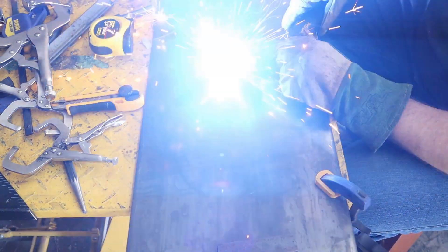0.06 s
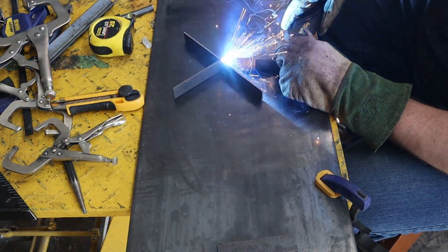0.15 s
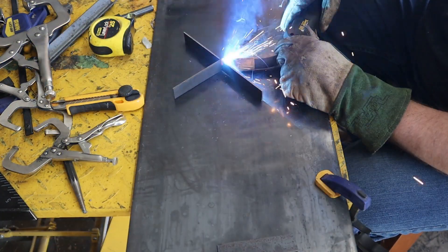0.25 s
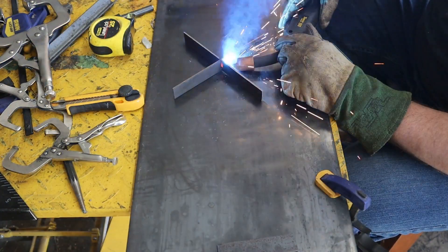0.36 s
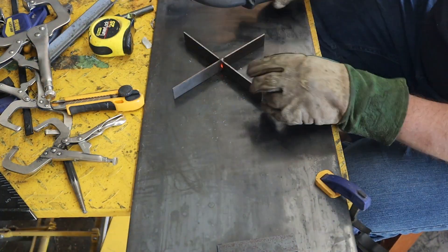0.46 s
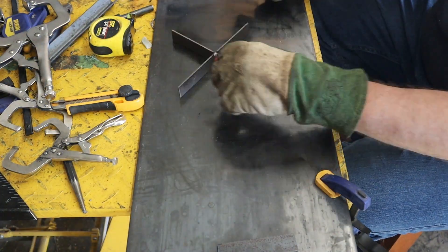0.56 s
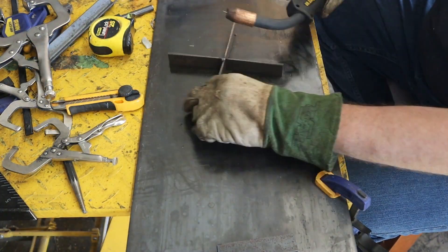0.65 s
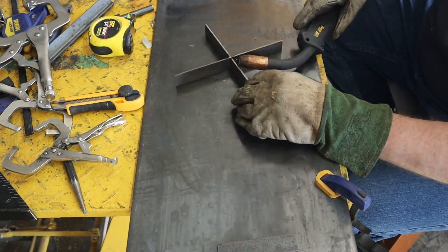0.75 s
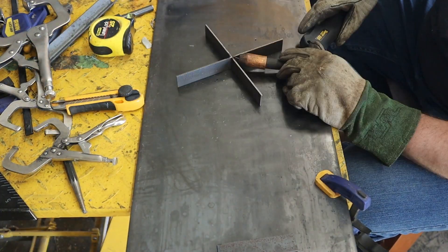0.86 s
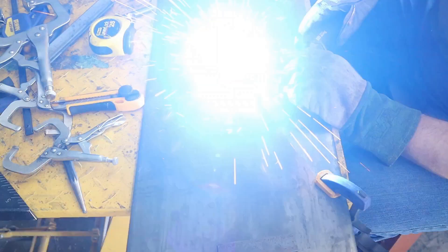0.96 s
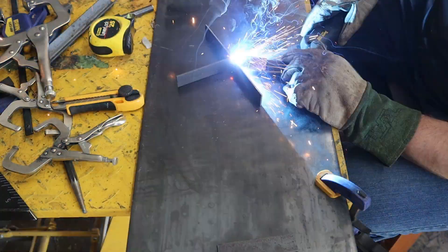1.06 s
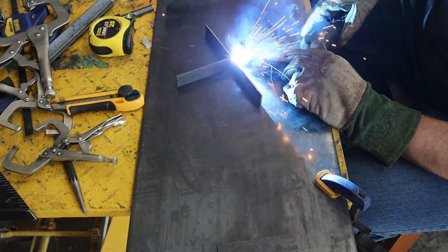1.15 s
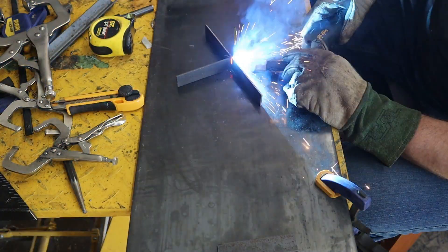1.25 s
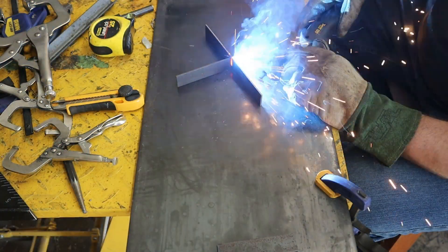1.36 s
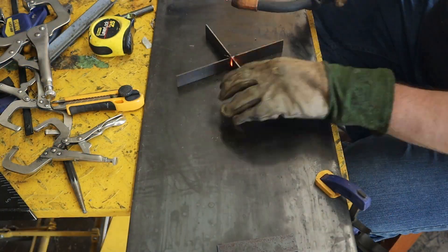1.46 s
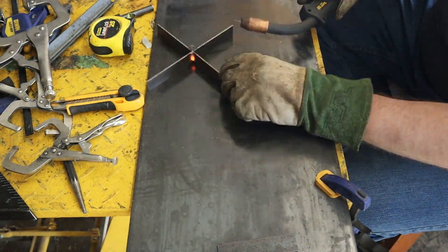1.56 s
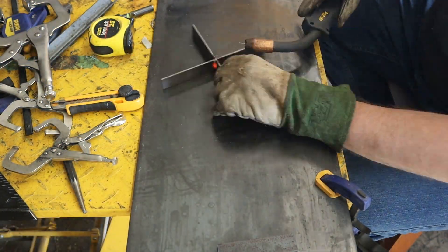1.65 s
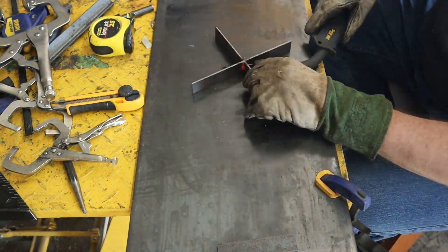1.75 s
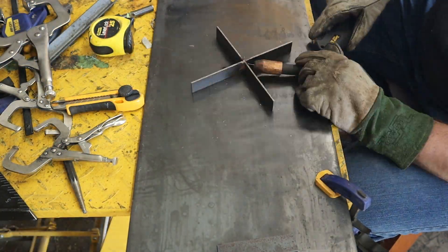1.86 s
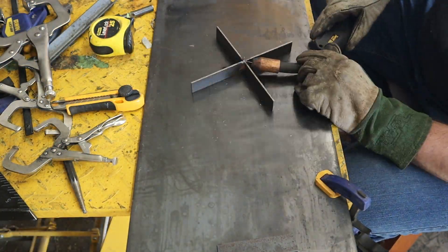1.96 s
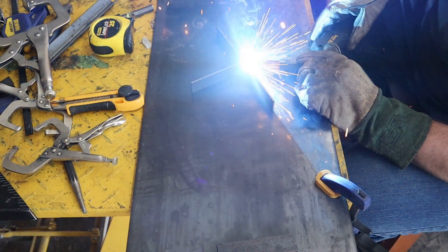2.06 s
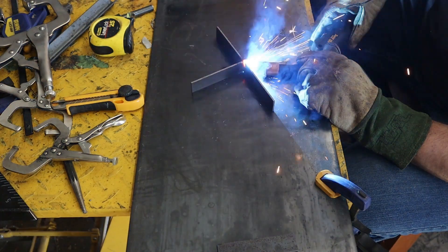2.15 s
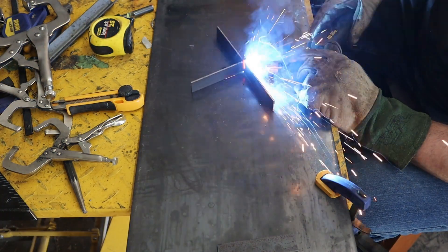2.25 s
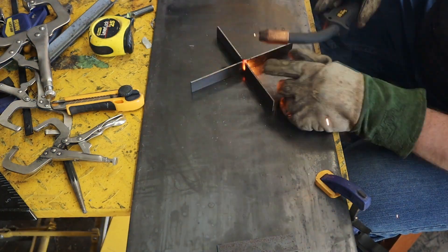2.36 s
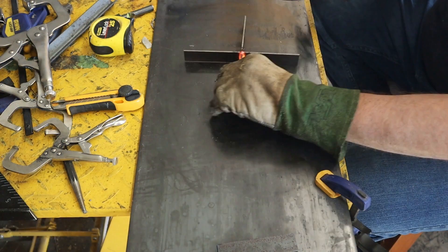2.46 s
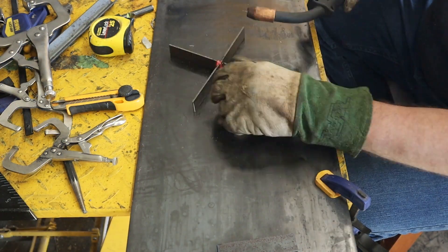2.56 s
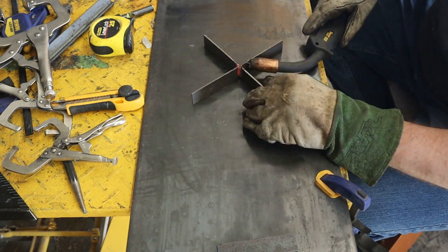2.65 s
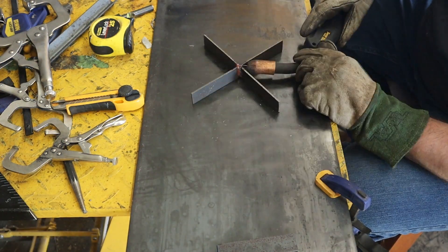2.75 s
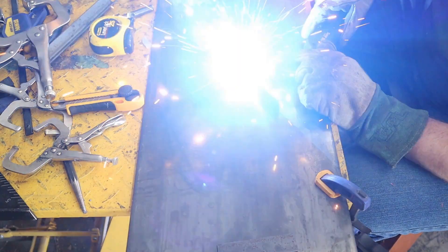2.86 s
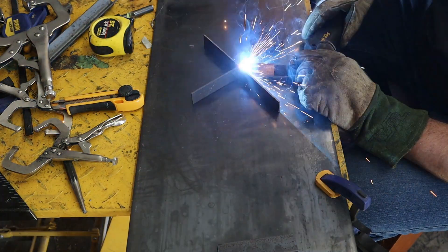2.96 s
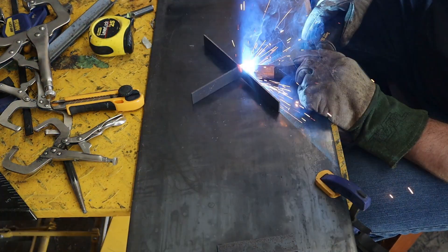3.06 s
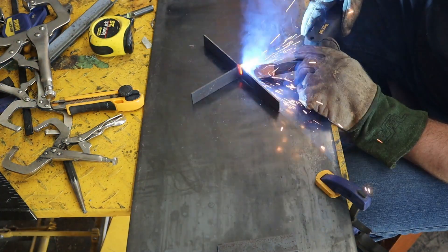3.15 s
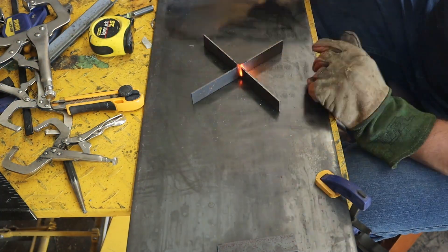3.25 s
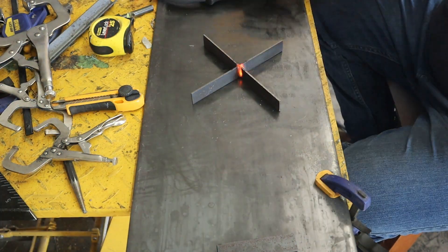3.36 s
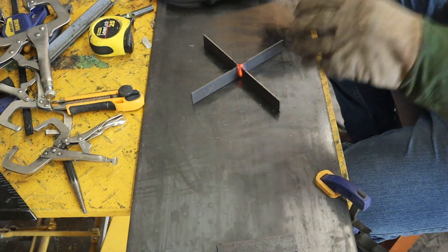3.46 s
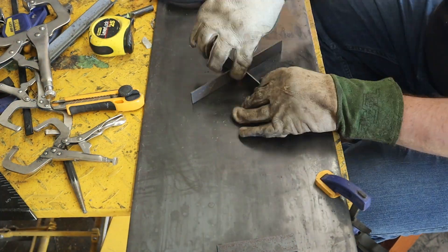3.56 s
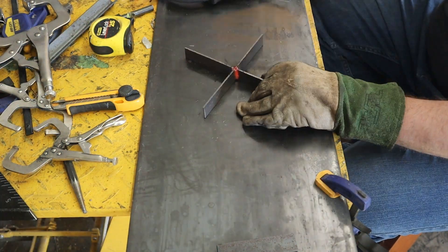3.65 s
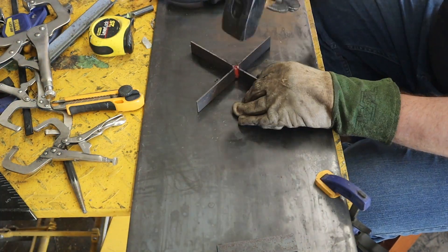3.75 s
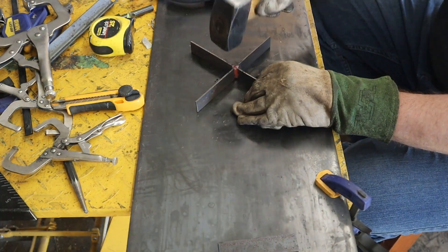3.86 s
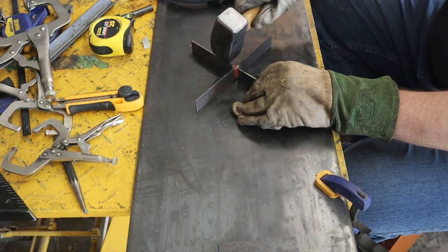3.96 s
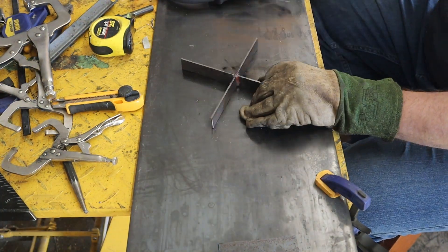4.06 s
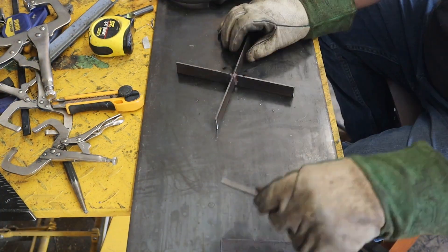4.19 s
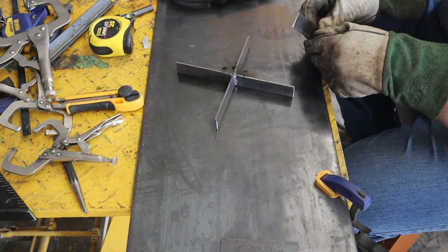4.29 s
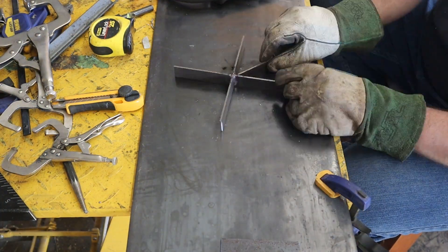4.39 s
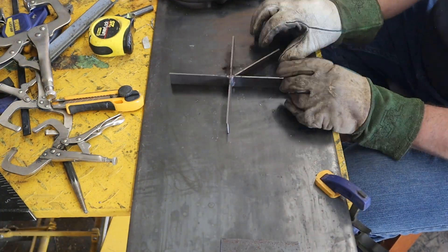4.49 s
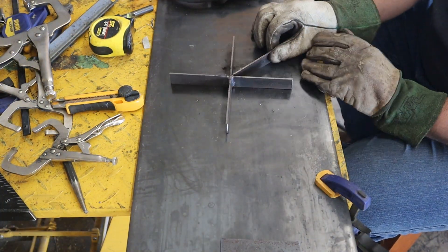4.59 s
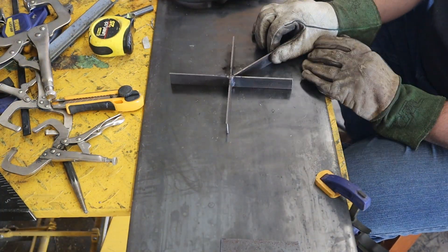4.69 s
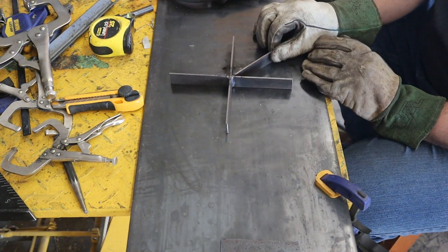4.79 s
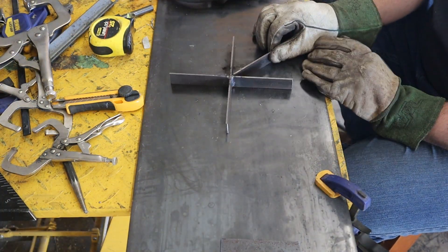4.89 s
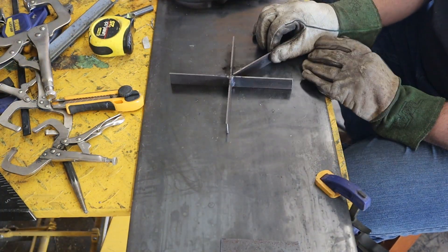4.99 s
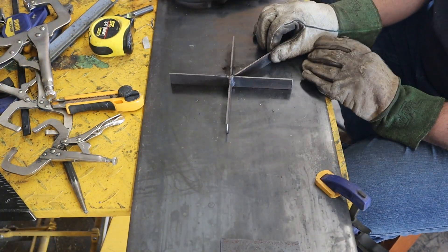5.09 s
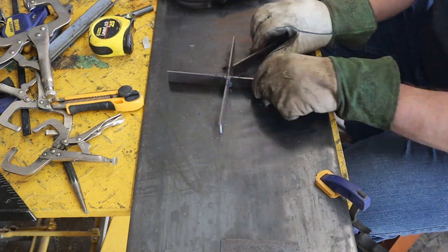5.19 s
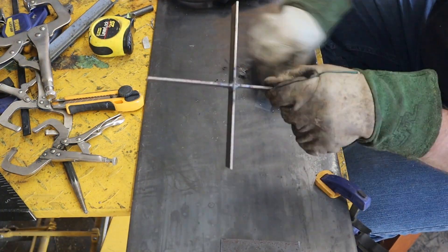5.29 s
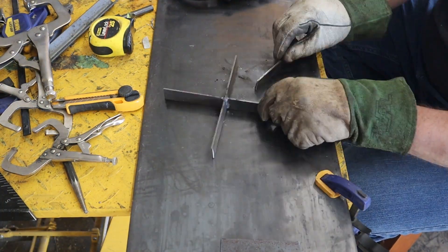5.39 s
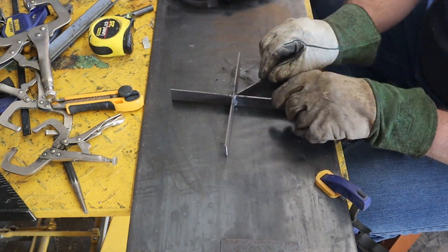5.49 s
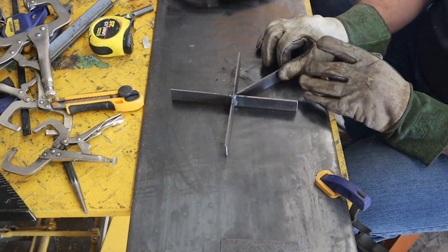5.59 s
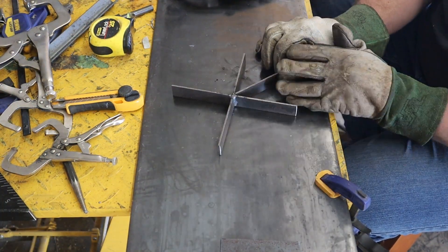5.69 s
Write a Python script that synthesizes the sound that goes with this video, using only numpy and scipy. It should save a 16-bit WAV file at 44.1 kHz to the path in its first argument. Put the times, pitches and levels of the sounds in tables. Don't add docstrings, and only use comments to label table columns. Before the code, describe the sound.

A phone-like microphone sits near a steel bench. Rapid electrical crackling with bright hiss and low pops fires four times, at roughly one-second intervals, the first attack distorting. Gloved handling makes clipped scrapes and clanks between. A cluster of hammering follows, with one overloaded blow, then a harsh scrape of a loose bar. Fan noise dips with each loud event and climbs back steadily.

```python
import sys
import numpy as np
from scipy import signal
from scipy.fft import rfft, irfft, next_fast_len
from scipy.io import wavfile

SR = 44100
rng = np.random.default_rng(int(sys.argv[2]) if len(sys.argv) > 2 else 0)


def wav_record(signal):
    frames = np.transpose(np.atleast_2d(signal))
    bounded = np.clip(frames, -1, 1)
    quanta = np.round(bounded * 32767).astype(np.int16)
    wavfile.write(sys.argv[1], SR, quanta)


def amplitude_ratio(level_db):
    exponent = np.asarray(level_db, float) / 20
    return 10 ** exponent


N = 252693
SLICE = 1470
SWELL_S = 0.00033

# pitch_hz, likeness (1 same, -1 opposite)
FAR_LIKENESS = [(100, 0.96), (400, 0.96), (1000, 0.41), (3000, -0.27), (6000, -0.43), (10000, -0.71),
                (15000, -0.21)]


def unit(x):
    return x / np.sqrt(np.mean(x ** 2) + 1e-20)


def along(points, hz):
    f, v = np.transpose(points)
    return np.interp(np.log(hz + 1), np.log(f + 1), v)


def slice_middles():
    return (np.arange(N) // SLICE + .5) * SLICE / SR


def held(rows, column=1):
    rows = np.array(rows)
    return np.interp(slice_middles(), rows[:, 0], rows[:, column], left=-120, right=-120)


def filtered(x, response):
    n = x.shape[-1]
    m = next_fast_len(n + 4096)
    return irfft(rfft(x, m) * response(np.fft.rfftfreq(m, 1 / SR)), m)[..., :n]


def peak(f, hz, width_hz):
    return 1j * f * width_hz / (hz * hz - f * f + 1j * f * width_hz)


def ports(f):
    # pitch_hz, width_hz
    cavities = [(9800, 1970), (10350, 1960)]
    cavity = np.array([hz * hz / (hz * hz - f * f + 1j * f * w) for hz, w in cavities])
    return cavity / (1 + (f / 14500) ** 6)


def stereo_noise(size, gain, likeness):
    turn = lambda f: np.arccos(np.clip(along(likeness, f), -1, 1)) / 2
    shares = lambda f: gain(f) * [np.cos(turn(f)), np.sin(turn(f))]
    mid, side = filtered(rng.standard_normal((2, size)), shares)
    return unit(filtered(np.array([mid + side, mid - side]), ports))


def until_cut(s):
    start = round(s * SR)
    cut = round(start / SLICE) * SLICE
    start = cut if abs(cut - start) < 120 else start
    return start, (start // SLICE + 1) * SLICE


def fan_level():
    full_db, recovery_db_per_s = -28, 47
    # pulled_s, let_go_s, fan_level_when_let_go_db
    ducks = [
        (.17, 0.591, -53),
        (1.17, 1.6, -56.5),
        (2.17, 2.574, -56.5),
        (3.04, 3.387, -56.5),
        (3.97, 4.29, -47),
        (5.4, 5.63, -45.5),
    ]
    t = slice_middles()
    db = np.full(N, float(full_db))
    for pulled, let_go, low_db in ducks:
        climb = low_db + recovery_db_per_s * np.maximum(t - let_go, 0)
        db = np.where(t > pulled, np.minimum(climb, full_db), db)
    return db


def fan():
    # pitch_hz, density_db (per Hz)
    air = [(30, -35), (120, -14), (260, -0.5), (500, -8), (1100, -8.5), (2200, -7), (4500, -13),
           (7500, -27.5), (11000, -72), (16000, -54)]
    # pitch_hz, width_hz, level_db
    case = [(713, 115, 4), (1500, 60, -0.5), (2100, 54, -41)]
    # shaft_multiple, level_db
    orders = [(1, -21.5), (4, -30), (7, -7.5), (8, -19.5), (14, -16.5)]
    shaft_hz, jump_rad = 108.46, 0.1383
    count = N // SLICE + 1
    size = count * SLICE
    housing = lambda f: amplitude_ratio(along(air, f)) + sum(amplitude_ratio(db) * abs(peak(f, hz, w)) for hz, w, db in case)

    phase_jumps = np.cumsum(jump_rad * rng.standard_normal(count))
    turn = 2 * np.pi * shaft_hz * np.arange(size) / SR + np.repeat(phase_jumps, SLICE)
    lines = sum(amplitude_ratio(db) * np.sin(round(k) * turn) for k, db in orders)
    unsteady = np.repeat(amplitude_ratio(3.5 * rng.standard_normal(count)), SLICE)
    whine = np.sqrt(2) * lines * unsteady

    steady = stereo_noise(size, housing, FAR_LIKENESS).reshape(2, -1, SLICE)
    shuffled = steady[:, rng.permutation(count)] * amplitude_ratio(rng.normal(0, 0.15, (count, 1)))
    balance_db = np.array([[-.8], [.8]])
    return (shuffled.reshape(2, -1) + whine)[:, :N] * amplitude_ratio(fan_level() + balance_db)


def handling():
    # start_s, level_db, edge_above_level_db, loudest_ring_hz
    torch = [(.167, -20.5, 10, 5000), (.533, -42, 14, 3000), (.567, -42, 8.5, 3790), (1.1, -28, 11.5, 1580),
             (1.133, -28.5, 6, 1500), (2.133, -28.5, 11.5, 1550), (3.0, -40.5, 13, 1920),
             (3.033, -41.5, 20.5, 3030)]
    turning = [(.667, -38.5, -4, 3790), (.733, -29.5, -15, 4100), (.768, -37, 5, 3900),
               (.833, -38, 2.5, 3000), (1.667, -32.5, 5, 4160), (1.7, -38, -1, 4620), (1.758, -30, 2, 3050),
               (1.833, -38.5, 0.5, 1540), (2.7, -35, 0, 2067), (2.733, -33.5, -17, 1000),
               (2.767, -35, 5, 3500), (2.8, -38.5, -15, 1500), (.933, -44, -7, 2000), (3.7, -48, -10, 1500),
               (4.534, -27.5, -22, 1723)]
    hammering = [(1.867, -35.5, -27, 1010), (3.467, -25.5, -1, 4020), (3.741, -43, 7, 1560),
                 (3.767, -18, -15, 1370), (3.967, -17.5, 3, 1940), (4.0, -26, -30, 1034),
                 (4.033, -17, -1, 1100), (4.067, -33.5, -15.5, 1500), (4.1, -20.5, -27, 1206),
                 (4.133, -18, 5, 1206), (4.167, -28.5, -28, 1206), (4.233, -26, -33, 1460),
                 (4.333, -40, 1, 1560)]
    blow = [
        (4.0927, -10.5, 19, 1095),
        (5.63, -45, -4, 4000),
    ]
    struck = [
        (.7, -22.5, 8.5, 4840),
        (.9, -29, -2, 3850),
        (2.612, -48.5, 3.5, 3000),
    ]
    digging_in = [
        (5.4, -16.5, 0, 2100),
        (5.433, -6, -4, 3140),
        (5.5, -17, 0.5, 2600),
    ]
    scraping_and_strays = [(5.367, -26, -1.5, 3420), (5.467, -17, -1, 2300), (5.533, -28, -4, 3100),
                           (5.567, -27, -3, 4900), (5.6, -45, -9, 2300), (3.4, -47, -14, 2200),
                           (2.633, -49.5, -12, 2700), (2.667, -41, -17, 3600)]
    # slices, bench_above_bars_db, change_over_slice_db
    actions = [(torch, -10, 1.1), (turning, -9, -1.9), (hammering, -2.8, -2.5), (blow, 6.4, -22.5),
               (struck, -12, -5), (digging_in, -18.5, 3.7), (scraping_and_strays, -11, -2.5)]
    bench_gain = lambda f: abs(peak(f, 1220, 2300)) / (1 + (f / 1500) ** 4)
    bar_band = lambda f: abs(peak(f, 2190, 5400)) ** 2 / (1 + (f / 6500) ** 6)
    edge_band = lambda f: abs(peak(f, 4970, 5300)) ** 2 / (1 + (f / 13200) ** 6)
    out = np.zeros((2, N + SLICE))
    for rows, bench_db, change_db in actions:
        for s, db, edge_db, ring_hz in rows:
            start, end = until_cut(s)
            size = end - start
            plate_hz = rng.uniform(1000, 12000, 60)
            modes = lambda f: 1.6 + (abs(peak(f, plate_hz[:, None], 60)) ** 2).sum(axis=0)
            bar_gain = lambda f: modes(f) * bar_band(f) * (.5 + abs(peak(f, ring_hz, 940)))
            bench = stereo_noise(size, bench_gain, FAR_LIKENESS)
            bars = stereo_noise(size, bar_gain, FAR_LIKENESS)
            edge = stereo_noise(size, lambda f: modes(f) * edge_band(f), FAR_LIKENESS)
            rub = bars + amplitude_ratio(bench_db) * bench + amplitude_ratio(edge_db - 8.5) * edge
            out[:, start:end] += rub * amplitude_ratio(db - 2.5 + change_db * np.linspace(-.5, .5, size))
    return out[:, :N]


def shorts():
    # start_s, snap_db, body_db
    tack_1 = [(0.2041, 9, -4.5), (0.2093, 12, -0.5), (0.2183, 12.5, 2.5), (0.2281, 4.0, 3), (0.2363, 7, -8),
              (0.2437, -1.5, -8.0), (0.2531, 1.5, -17), (0.259, -3.0, -6.0), (0.2646, 2.5, -17),
              (0.2704, -4, -15), (0.2779, -0.5, -8.5), (0.2846, -0.5, -10.5), (0.2916, -3.5, -9.0),
              (0.2995, -2, -11), (0.3058, -2.5, -10.5), (0.3142, -4.5, -10.5), (0.3206, 1.5, -8.0),
              (0.3272, 1.0, -10.5), (0.3393, -1.5, -8.0), (0.3461, -2, -8), (0.3532, -5.5, -10.5),
              (0.3604, -4.5, -13.5), (0.3694, -4, -10.5), (0.3764, 1.0, -3.5), (0.3848, 5, -1),
              (0.3905, -7.5, -10), (0.3975, -0.5, -10.0), (0.4048, -4, -11), (0.4117, -2.5, -7),
              (0.4182, -3, -6), (0.4259, 2, -8.5), (0.4354, -1, -4), (0.4497, -3.5, -5), (0.4559, -7, -7.5),
              (0.4629, -12.0, -7), (0.4686, 6.5, 3.5), (0.4812, -10, -10), (0.4876, -7.5, -10.5),
              (0.4954, -11.5, -7), (0.5089, -9.0, -9.5), (0.5183, -14.0, -11.5), (0.5274, -13, -13),
              (0.5331, -16, -13), (0.5439, -15, -10), (0.5548, -12.5, -7.5), (0.5647, -13.0, -9.5)]
    tack_2 = [(1.1663, -0.5, -8), (1.1724, -9, -16), (1.1785, -10.0, -19), (1.1836, 3.0, -10),
              (1.1898, 0.5, -7.5), (1.198, 4.5, -4.5), (1.2047, -5.0, -1.5), (1.2135, 0, 0.5),
              (1.2213, 2.5, -2.5), (1.2283, -0.5, -3), (1.2392, 3.0, -3), (1.2462, 6, 1),
              (1.2534, 4.5, -3.0), (1.2611, -3.0, -4), (1.27, -5, -8.0), (1.2787, -1, -7.5),
              (1.2922, 3.5, -4.0), (1.2998, -12, -8), (1.3123, -3.5, -3), (1.3193, -8.5, -12),
              (1.3314, -2.5, -6.5), (1.3519, -5.5, -12), (1.36, -8.0, -8), (1.3666, -4.5, -8),
              (1.3751, 5, -5.5), (1.382, -8.0, -8), (1.39, -2.5, -7.5), (1.398, -1, -5.5),
              (1.4042, -8, -9.0), (1.4119, -8, -5.5), (1.4189, -6, -9.5), (1.4268, -5.0, -4),
              (1.4371, -12, -11.5), (1.4449, -9.5, -9.5), (1.4516, -15, -8), (1.4598, -15.0, -8.5),
              (1.467, -10.0, -17), (1.4739, -7, -6.5), (1.4822, -14, -10.5), (1.4895, -12.5, -6),
              (1.4971, -9, -8.5), (1.5071, 3.5, 3.5), (1.5157, -2.5, -2.5), (1.5243, -5.5, -3.5),
              (1.534, -13.5, -10), (1.5466, -7.5, -7), (1.5532, -12, -11), (1.5596, -5.5, -8),
              (1.5659, -16, -9)]
    tack_3 = [(2.175, 4.0, 3.5), (2.1815, -3.5, -16), (2.19, -1.5, -8.5), (2.199, -1, -7.5),
              (2.2037, 6.5, -2.5), (2.2106, 2.0, -3), (2.218, 8, 0.5), (2.223, -1.5, 0), (2.2298, -1, -4),
              (2.234, -2.5, -9), (2.241, 2, -3), (2.2478, 1.5, -6), (2.2554, 2, -3.0), (2.2626, -2.0, -4),
              (2.2671, -3.0, -1.5), (2.2738, 2.0, -2.5), (2.2801, 0, -5.0), (2.2867, -2.0, -4),
              (2.2929, 3.5, -3), (2.2998, -2, -7.5), (2.3118, -5, -25), (2.3278, -1, -5.5),
              (2.3394, -3.0, -9.5), (2.3462, -6, -9.5), (2.3571, -9.0, -11.5), (2.3633, -7, -8.5),
              (2.3768, -3.5, -9), (2.3834, -16.0, -13), (2.3898, -3, -9.0), (2.3966, -1, -5.5),
              (2.4064, -5, -12), (2.4147, -6.5, -9.5), (2.427, -9.0, -20), (2.436, 0.5, -6.5),
              (2.4424, -2.5, -5.5), (2.449, -3, -4), (2.4562, -3.0, -8), (2.4674, -4.5, -9),
              (2.4768, -11.5, -10.5), (2.4841, -13.5, -18), (2.4912, -13, -22), (2.498, -14, -26.5),
              (2.5044, -18, -23), (2.509, -11.5, -10.5), (2.526, -8, -7), (2.533, -27, -26)]
    tack_4 = [(3.048, 1, -8), (3.0564, 5.0, -6.5), (3.0643, -3, -9.5), (3.0877, 3.5, -1.5),
              (3.1006, -9, -20), (3.1198, 2, -5), (3.1473, 9, 6), (3.1627, -2, -9), (3.1814, 2, -3.5),
              (3.1923, 1.0, -7), (3.199, -6, -13), (3.2085, -2, 1.5), (3.2178, 1, -6), (3.2272, 1.5, 0.5),
              (3.2409, -6.5, -7.0), (3.2502, -1, -5), (3.258, -9, -12), (3.2656, -12, -14.5),
              (3.2744, -9.5, -10), (3.2842, -1.5, -6.5), (3.294, -4.5, -8), (3.3032, -9, -7),
              (3.3141, -11.0, -6.5), (3.3243, -12.0, -5.5), (3.3336, -4.5, -15), (3.3397, -6.0, -4.5),
              (3.3469, -0.5, -4.5), (3.3536, -0.5, -5), (3.3613, 0, -6.0), (3.3666, -7.5, -17),
              (3.3738, -10.5, -7), (3.3809, -9.0, -8.5), (3.388, -5, -9), (3.3954, -12.5, -13.5)]
    s, snap_db, body_db = np.vstack([tack_1, tack_2, tack_3, tack_4]).T
    return s - SWELL_S, snap_db - 4, body_db - 6


def bursts(at, db, t60):
    train = np.bincount(at, amplitude_ratio(db), N)
    return signal.lfilter([1], [1, -amplitude_ratio(-60 / (t60 * SR))], train)


def snaps(at, db, hz, t60, scatter, rise_s):
    length = np.arange(160)
    t = length / SR
    shared = rng.standard_normal((len(at), 2)) @ [[0.92, 1], [0.147, -0.28]]
    pitch = hz[:, None] * np.exp(scatter * shared)
    envelope = amplitude_ratio(db[:, None] - 60 * t / t60) * (1 - np.exp(-t / rise_s))
    out = []
    for port in (0, 1):
        wave = envelope * np.sin(2 * np.pi * pitch[:, port, None] * t)
        where = at[:, None] + port + length
        out.append(np.bincount(where.ravel(), wave.ravel(), N))
    return np.array(out)


def arc():
    # start_s, snap_hz, crack_against_body_db
    snap_pitch = [(.2, 8420, -8), (.5, 10250, -3), (1.17, 9850, -8.5), (1.4, 11060, -7), (1.55, 10260, 0),
                  (2.17, 10470, -11.5), (2.5, 10570, -1.5), (3.1, 9730, -13.5), (3.4, 11150, 1)]
    # start_s, hiss_db, roar_db
    sizzle = [
        [(0.2, -38, -26.5), (0.358, -20, -28.5), (0.566, -35.5, -31.5)],
        [(1.167, -21.5, -30), (1.367, -24, -34), (1.566, -44, -28.5)],
        [(2.167, -27, -30.5), (2.345, -25, -32.5), (2.533, -30.5, -34.5)],
        [(3.034, -37, -32.5), (3.234, -31.5, -31.5), (3.4, -59.5, -29.5)],
    ]
    # pitch_hz, density_db (per Hz)
    roar_colour = [(150, -14.5), (400, -2), (1000, -5.5), (3200, 0), (5000, -2.5), (7000, -10)]
    # pitch_hz, density_db (per Hz)
    hiss_colour = [(2000, -45), (5000, -17), (7500, 3), (9500, -1), (12000, -0.5), (16000, 0)]
    # pitch_hz, likeness
    near_likeness = [(200, 0.84), (1000, 0.45), (3000, 0.064), (10000, 0.023)]
    left_late_s = 0.00005
    echo_s, echo_db = np.array([[0.0014], [0.00113]]), [[-13], [-8.5]]
    balance = amplitude_ratio([[-1], [1]])

    s, snap_db, body_db = shorts()
    at = np.round(s * SR).astype(int)
    pitch_s, pitch_hz, pitch_crack_db = np.transpose(snap_pitch)
    hz = np.interp(s, pitch_s, pitch_hz)
    crack_db = np.interp(s, pitch_s, pitch_crack_db)
    lead, lead_db, thump = rng.uniform(size=(len(s), 3)).T
    early = at - np.round(SR * (0.0012 + 0.0022 * lead)).astype(int)
    late = at + 9

    snap = snaps(at, snap_db - 18.5, hz, 0.0038, 0.03, SWELL_S)
    snap = snap + snaps(late, snap_db - 8.5, hz, 0.0011, 0.03, 0.00003)
    snap = snap + snaps(early, snap_db - 29.5 + 12 * lead_db, hz, 0.0027, 0.076, SWELL_S)
    snap = snap + snaps(late, body_db + crack_db - 2.0, 0.54 * hz, 0.0022, 0.1, 0.00004)
    bridge = np.bincount(late, amplitude_ratio(snap_db - 16), N)
    snap = snap + filtered(bridge, lambda f: peak(f, 11000, 12000))

    hiss = stereo_noise(N, lambda f: amplitude_ratio(along(hiss_colour, f)), near_likeness)
    roar = stereo_noise(N, lambda f: amplitude_ratio(along(roar_colour, f)), near_likeness)
    spit = hiss * (bursts(late, snap_db - 21, 0.0018) + bursts(at, snap_db - 16, 0.0086))
    body = roar * (bursts(late, body_db - 7.0, 0.0078) + bursts(at, body_db - 31.0, 0.067))
    spit = filtered(spit, lambda f: peak(f, 8900, 7000))
    body = filtered(body, lambda f: peak(f, 890, 4200) * 1j * f / (200 + 1j * f))

    lateness = lambda f: np.exp(-2j * np.pi * f * left_late_s * np.array([[1], [0]]))
    dip = lambda f: peak(f, 1100, 2600) / (1 - (f / 4000) ** 2 + 1j * f / 3300) * lateness(f)
    knock = np.bincount(late, amplitude_ratio(body_db + 12.0), N)
    body = body - filtered(knock, dip)
    thumps = np.bincount(at, amplitude_ratio(body_db + 4.0) * (2 * thump - 1), N)
    body = body + filtered(thumps, lambda f: peak(f, 70, 120) / (1 + 1j * f / 200))

    blast = spit - filtered(snap, ports) + body * balance
    blast = filtered(blast, lambda f: 1 + amplitude_ratio(echo_db) * np.exp(-2j * np.pi * f * echo_s))

    spatter_db = 7 * rng.exponential(size=9000).clip(0, 3)
    sputter = unit(bursts(rng.integers(0, N, 9000), spatter_db, 0.0051) + 3)
    pool = 0
    for rows in sizzle:
        pool = pool + hiss * sputter * amplitude_ratio(held(rows) - 10)
        pool = pool + roar * amplitude_ratio(held(rows, column=2) - 1.1)
    return blast + pool * balance


def pushes():
    # start_s, left_peak, right_peak (full scale 1), width_ms
    big_pushes = [(0.209, -0.31, -0.24, 1.3), (0.2278, 0.38, -0.66, 1.5), (0.2284, -0.93, 0.41, 1.4),
                  (0.385, 0.5, 0.53, 0.97), (1.167, -0.033, -0.063, 1.8), (1.2145, -0.051, -0.056, 1.4),
                  (1.222, -0.067, -0.044, 1.3), (1.24, -.03, -0.0047, 2.7), (1.2924, -0.03, -0.03, 2.3),
                  (1.402, .012, .012, 2.6), (1.512, .015, .02, 2.1), (2.1655, 0.17, 0.12, 2),
                  (2.174, -0.68, 0.88, 0.35), (2.2024, -0.11, -0.062, 3), (2.218, -0.017, -0.22, 1.2),
                  (2.234, 0.15, 0.27, 1.05), (3.055, -0.048, -0.039, 2.3), (3.1479, 0.45, 0.6, 2),
                  (3.0888, -.02, -.012, 1.7), (4.0926, 0.68, 0.7, 1.6), (5.433, 0.11, 0.076, 1.4),
                  (5.468, 0.014, -.012, 2.1)]
    out, t = np.zeros((2, N + SR)), np.arange(SR // 20) / SR
    for s, left, right, ms in big_pushes:
        u = t / (ms / 1000)
        swing = 2 * (1 - u + u * u / 8) * np.exp(-u * 0.81)
        shape = swing * (1 - np.exp(-t / 0.0002))
        out[:, round(s * SR):][:, :len(t)] += shape * [[left], [right]]
    return out[:, :N]


def ringing():
    # pitch_hz, level_db
    cross = [(458, -6), (1030, 2), (1328, -8), (1475, -6.5), (2930, -4.5), (3380, -5), (4100, -10),
             (4450, -8.5), (5000, -14), (5810, -9), (7040, -20), (7900, -16), (9380, -19), (10300, -8.5)]
    bar = [(2100, -9.5), (2950, -0.5), (4150, -6), (5280, -8), (6540, -10.5)]
    held_arm = [(1034, -9), (2000, -0.5), (4091, -7), (5060, -4.5), (8200, -16), (9380, 1)]
    flat = [(457, -2), (856, -7.5), (1740, -10), (1320, -2.5), (1470, 1), (2970, -5), (3360, -10),
            (4460, -13), (5830, -14.5), (7650, -25), (10260, -7.5), (11600, -28)]
    lifted = [(3350, 1.5), (4200, -0.5), (7500, -6), (8600, -5.5), (10200, -9), (11700, -3.5)]
    spun = [(974, -9), (2925, 1.5), (3900, -10.5), (5810, -6.5), (8134, -19.5), (10240, -10)]
    twisted = [(915, -2.5), (3360, 1), (4400, -10), (4670, -9), (5440, -9.5), (5690, -11), (7030, -9),
               (8850, -6), (9380, -0.5), (10500, -3)]
    slid = [(3150, 4), (4050, 0.5), (4870, -1), (5810, 1), (7270, -10), (8000, -9), (9300, -15)]
    under_hammer = [(436, -4), (888, -9), (1050, -4), (1270, -2.5), (1490, -4), (2060, -4), (2930, 0),
                    (3350, -2.5), (3850, -9), (4860, -10)]
    # start_s, level_db, freest_mode_hz
    cross_knocks = [(.667, -53, 4100), (.733, -40, 4400), (1.7, -39, 4450), (2.7, -39, 3380),
                    (2.733, -43.5, 2880)]
    bar_knocks = [(5.433, -10.5, 2950), (5.467, -24, 2510), (5.5, -29.5, 4150)]
    arm_knocks = [(3.2, -30.5, 3000), (1.5, -39, 4500)]
    flat_knocks = [(3.767, -17.5, 1500), (5.7, -41.5, 1400), (2.3, -41.5, 1000)]
    lifted_knocks = [(5.367, -28, 6000)]
    spun_knocks = [(.9, -26, 2925), (.833, -46, 5810), (2.7, -45.5, 2925)]
    twisted_knocks = [(.7, -27.5, 3360)]
    slid_knocks = [(1.667, -38.5, 4050)]
    hammer_knocks = [(3.967, -26, 1270), (4.033, -26.5, 888), (4.1, -31.5, 1050), (4.133, -22.5, 1270)]
    objects = [(cross_knocks, cross), (bar_knocks, bar), (arm_knocks, held_arm), (flat_knocks, flat),
               (lifted_knocks, lifted), (spun_knocks, spun), (twisted_knocks, twisted),
               (slid_knocks, slid), (hammer_knocks, under_hammer)]
    grip_db_per_octave = 2.5
    rattle_rad = 0.035
    out = np.zeros((2, N + SLICE))
    for knocks, modes in objects:
        hz, mode_db = np.transpose(modes)[:, :, None, None]
        t60 = 0.2 * (hz / 3000) ** 0.67
        for s, db, free_hz in knocks:
            start, end = until_cut(s)
            t = np.arange(end - start) / SR
            grip_db = grip_db_per_octave * abs(np.log2(hz / free_hz))
            level_db = db + mode_db - grip_db - 60 * t / t60
            wander = rattle_rad * rng.standard_normal((len(hz), 1, len(t))).cumsum(axis=2)
            cycle = rng.uniform(size=(len(hz), 1, 1)) + [[0], [.25]]
            tones = amplitude_ratio(level_db) * np.sin(2 * np.pi * (hz * t + cycle) + wander)
            out[:, start:end] += tones.sum(axis=0)
    return out[:, :N]


def scene():
    return fan() + handling() + arc() + pushes() + ringing()


def top_cut(x):
    return signal.sosfilt(signal.butter(12, 15950, fs=SR, output="sos"), x)


def record(dry):
    x = filtered(dry, lambda f: 1 / (1 + (f / 15800) ** 40))
    x = x / (1 + abs(x) ** 16) ** (1 / 16)
    return top_cut(x)


dry = scene()
out = record(dry)
wav_record(out)
```